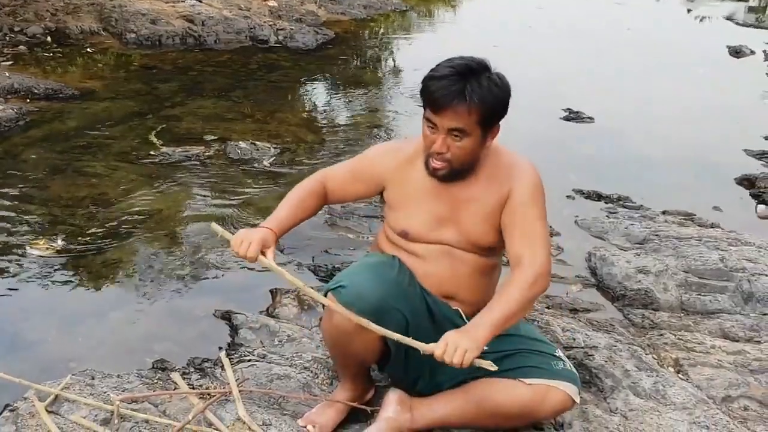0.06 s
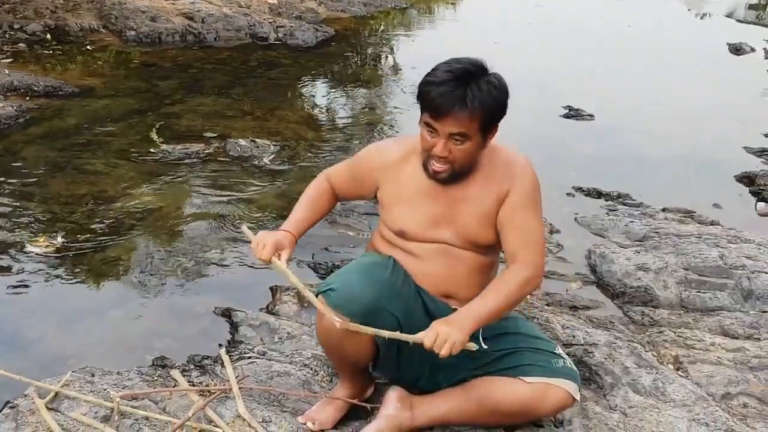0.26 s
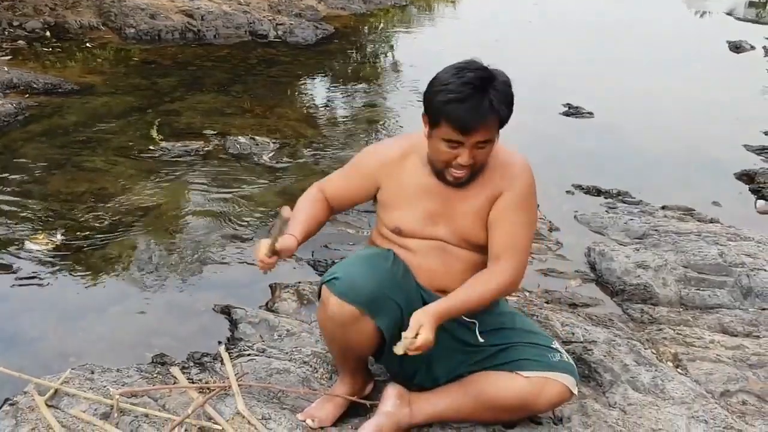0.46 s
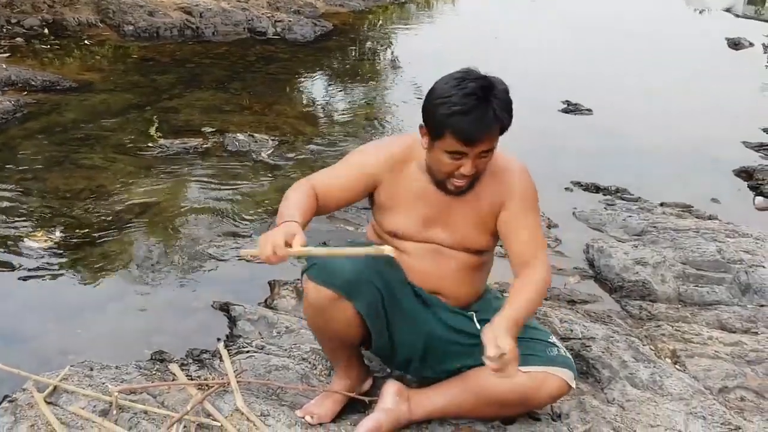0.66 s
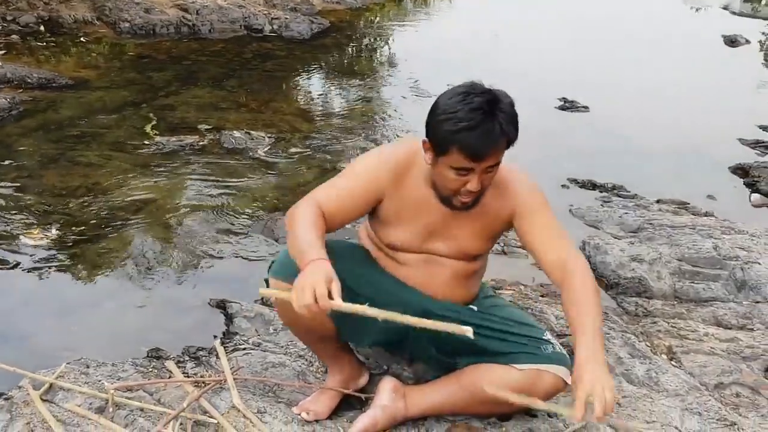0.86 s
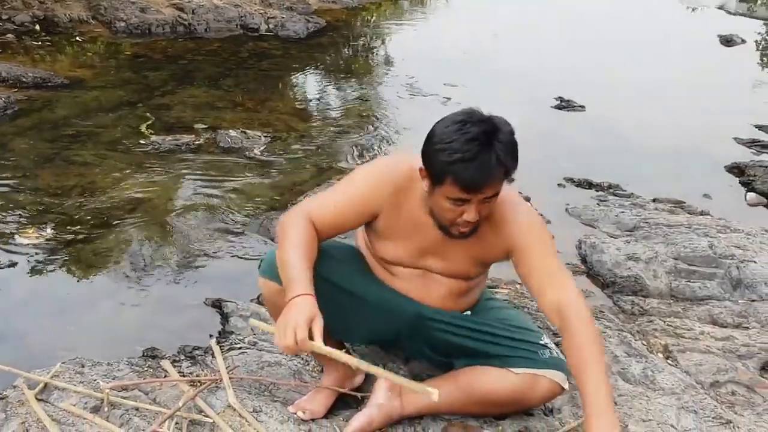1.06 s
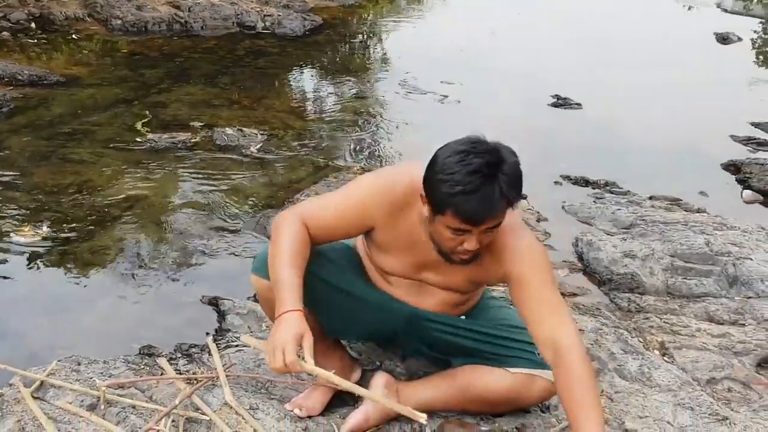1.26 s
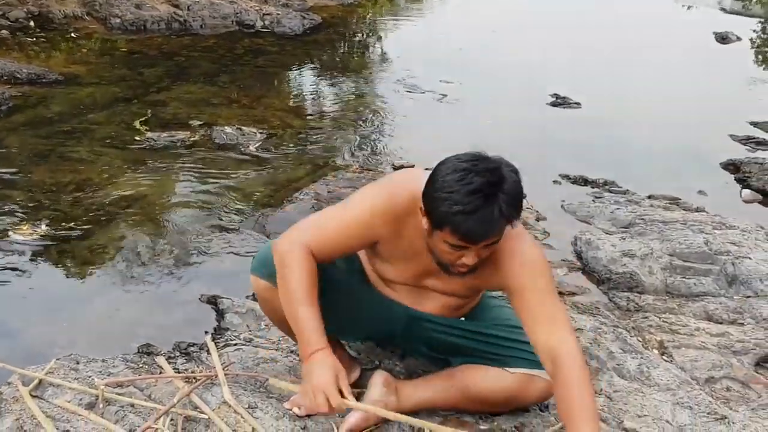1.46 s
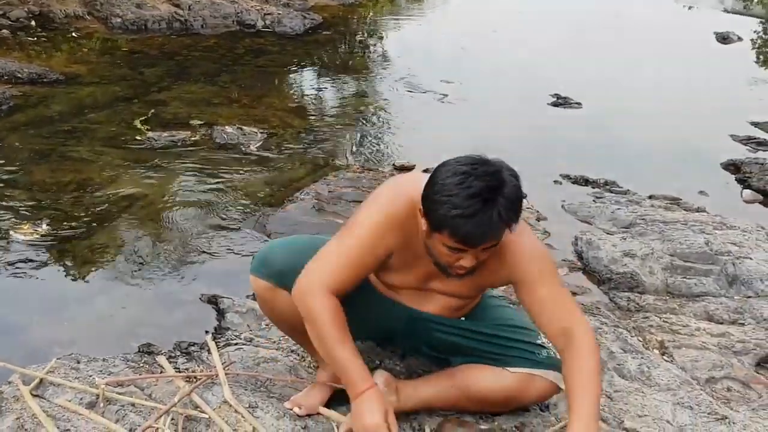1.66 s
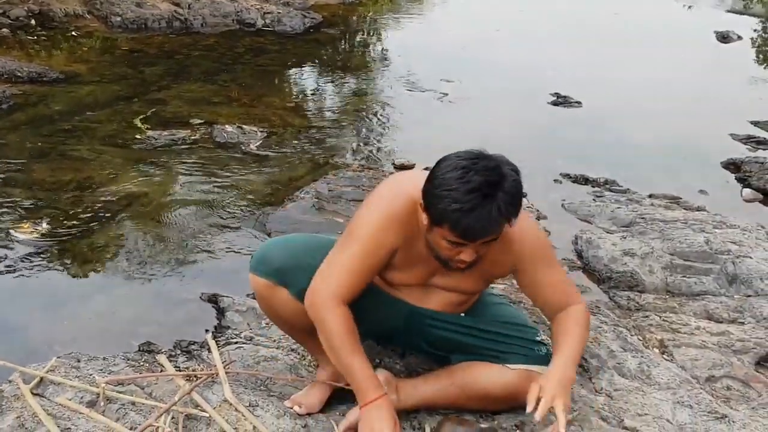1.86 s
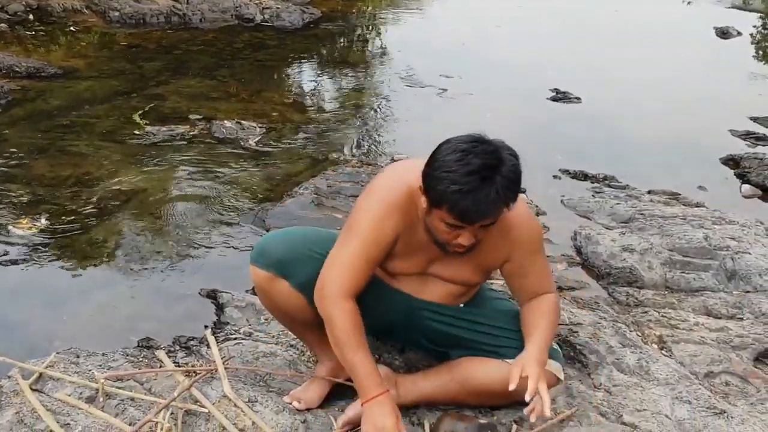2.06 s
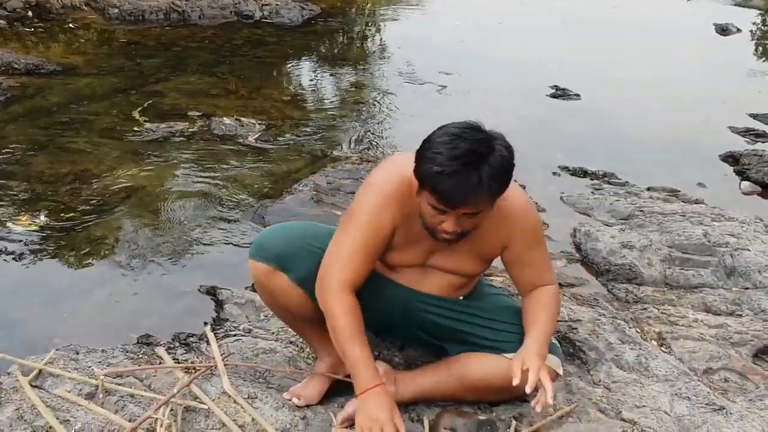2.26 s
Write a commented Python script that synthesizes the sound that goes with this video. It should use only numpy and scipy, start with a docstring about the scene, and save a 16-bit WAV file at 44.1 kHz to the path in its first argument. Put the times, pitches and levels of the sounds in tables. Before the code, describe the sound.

A dry stick ticks, then breaks in a loud, bright, splintering crack close to the microphone; its pieces tap once and later knock softly on rock, over faint high insect buzz outdoors.

```python
"""Insects buzz in high bands over a faint hush and a low breeze: filtered noise with a moving level.
A dry stick bends, cracks and tears: bursts of clicks and a dense crackle excite short fibre resonances.
The pieces are then knocked down on rock: longer bursts ring stick resonances, each with a low thump.
Trees and rock scatter the sounds back as a wash: convolution with octave bands of dying noise."""
import sys
import numpy as np
from scipy import signal
from scipy.fft import rfft, irfft
from scipy.io import wavfile

SR = 44100
rng = np.random.default_rng(int(sys.argv[2]) if len(sys.argv) > 2 else 0)


def digitize_waveform(pressure):
    """Quantize a signal to 16-bit integers and store it at the path in sys.argv[1].

    Rows of a 2-D input are taken as channels; values are limited to [-1, 1].
    """
    field = np.atleast_2d(pressure).T
    bounded = np.clip(field, -1, 1)
    quanta = np.round(bounded * 32767).astype(np.int16)
    wavfile.write(sys.argv[1], SR, quanta)


N = 101429

# broad resonances of splitting fibres: (frequency [Hz], relative level [dB], 60 dB decay time [s])
FIBRE_MODES = [(2480, -10, 0.0023), (3180, -7, 0.0036), (4060, -4.5, 0.0036), (5100, -4, 0.0026),
               (6450, -3, 0.0022), (7760, -0.5, 0.0028), (8950, 0, 0.0015), (11480, -2.5, 0.0019),
               (13440, -7.5, .003), (16200, -7.5, 0.0023)]


def amp(db):
    """Decibels to amplitude ratio: 20 dB is a factor of ten."""
    return 10 ** (np.asarray(db) / 20)


def rms_one(x):
    """Normalisation to unit root-mean-square."""
    return x / np.sqrt(np.mean(x ** 2) + 1e-20)


def in_time(rows, **ends):
    """Linear interpolation of each column over the scene's samples."""
    times, *columns = np.transpose(rows)
    return [np.interp(np.arange(N) / SR, times, column, **ends) for column in columns]


def sides(pan_db):
    """Level difference between the ears: left and right gains, pan_db apart."""
    return amp(np.array([[.5], [-.5]]) * pan_db)


def drift(rate_hz):
    """Low-passed noise: a slow random wander of unit spread."""
    step = 40   # samples between computed points
    pole = np.exp(-2 * np.pi * rate_hz * step / SR)
    noise = rng.standard_normal(N // step + 2002)
    slow = signal.lfilter([1], [1, -2 * pole, pole * pole], noise)[2000:]   # settled part only
    return np.interp(np.arange(N) / step, np.arange(len(slow)), rms_one(slow))


def insect(level_db, hz, width_hz, buzz_hz, sharpness, wander, throb_hz, throb_db, gain_db, pan_db):
    """Amplitude modulation of noise: pulses at the buzz rate, band-passed, then throbbing in level."""
    t = np.arange(N) / SR
    edges = [hz - width_hz / 2, hz + width_hz / 2]
    band = signal.butter(3, edges, "band", fs=SR, output="sos")
    phase = 2 * np.pi * buzz_hz * t + wander * drift(3.9)
    pulses = np.exp(min(sharpness, 6 / 5) * np.sin(phase))
    chorus = signal.sosfilt(band, pulses * rng.standard_normal((2, N)))
    throb = np.sin(2 * np.pi * throb_hz * t + 0.92) + 2.1 * drift(7.0)
    return amp(level_db + gain_db + throb_db * throb) * rms_one(chorus) * sides(pan_db)


def insects(level_db):
    """Superposition of independent choruses, a narrow one overlapping a broad one near 8 kHz."""
    # one chorus a row: (centre [Hz], width [Hz], buzz rate [Hz], buzz sharpness [-], buzz wander [rad],
    # throb rate [Hz], throb depth [dB], gain [dB], left-right [dB])
    choruses = [(8145, 420, 111, 0.61, .4, 17, 0.5, -1.5, 9), (8036, 1400, 104, 0.26, .6, 5.7, 0.5, 0, 4),
                (10880, 1200, 123.1, 0.41, .15, 2.9, 0.1, -10, 14),
                (4690, 700, 40, .3, .8, 3, -0.9, -13.5, 0)]
    return sum(insect(level_db, *chorus) for chorus in choruses)


def hush(level_db):
    """Spectral shaping of wide noise: the faint open air, its level flickering at random."""
    # colour of the noise: (frequency [Hz], relative spectral level [dB])
    hush_spectrum = np.array([(30, -7), (100, -5.5), (250, -18.5), (600, -8.5), (1200, -15.5),
                              (2400, -13.5), (4000, -10), (5800, -20.5), (7000, -11.5), (9500, -19.5),
                              (12500, -17), (16000, -6)])
    gain_db, flicker_db, pan_db = -2.5, 1.2, 6.5
    hz = np.maximum(np.arange(N // 2 + 1) * SR / N, 20)
    colour = amp(np.interp(np.log(hz), np.log(hush_spectrum[:, 0]), hush_spectrum[:, 1]))
    noise = irfft(rfft(rng.standard_normal((2, N))) * colour, N)
    return amp(level_db + gain_db + flicker_db * drift(9.9)) * rms_one(noise) * sides(pan_db)


def breeze(level_db):
    """Band-limited noise of moving air at the microphone ports, independent on each side, lumpy in level."""
    gain_db, gust_db, pan_db = -14, 2.5, 2.5
    band = signal.butter(2, [30, 110], "band", fs=SR, output="sos")
    low = signal.sosfilt(band, rng.standard_normal((2, N)))
    return amp(level_db + gain_db + gust_db * drift(9.9)) * rms_one(low) * sides(pan_db)


def ring(clicks, hz, t60):
    """Damped resonance: a unit click sets a decaying sine of height 1 ringing."""
    radius, angle = amp(-60 / (t60 * SR)), 2 * np.pi * hz / SR
    feedback = [1, -2 * radius * np.cos(angle), radius * radius]
    return signal.lfilter([0, np.sin(angle)], feedback, clicks + 1e-18)


def pair(clicks, likeness):
    """Partial coherence: the right side gets the left's clicks a little later, mixed with its own."""
    lag_s = .0002
    like = np.clip(likeness, 0, 1)
    late = np.roll(clicks[0], int(lag_s * SR), axis=-1)
    return np.stack([clicks[0], like * late + np.sqrt(1 - like ** 2) * clicks[1]])


def low_thump(t, hz, t60, right_share):
    """Two decaying partials, the lower one lasting longer, with a soft onset."""
    upper = np.sin(2 * np.pi * hz * t) * amp(-60 * t / t60)
    under = np.sin(2 * np.pi * hz * .56 * t) * amp(-4 - 60 * t / (1.5 * t60))
    return (upper - under) * (1 - np.exp(-4 * hz * t)) * [[1], [right_share]]


def blows(events, modes, thump_hz, thump_t60, thump_right, likeness):
    """Impulsive excitation of resonances: click bursts with thumps, and bare clicks to feed the wash."""
    after_db, after_s = -10, 0.0036   # smaller fibres follow each burst
    scatter_db, tilt_centre_hz = 2.5, 4000
    out, sent = np.zeros((2, N)), np.zeros((2, N))
    t = np.arange(2600) / SR
    thump = low_thump(t, thump_hz, thump_t60, thump_right)
    for s, db, pan_db, burst_ms, wash_db, tilt_db, thump_db in events:
        draw = rng.standard_normal((2, len(t)))
        scatter = scatter_db * rng.standard_normal(len(modes))
        main = np.exp(-(1000 * t / max(burst_ms, .1)) ** 2)
        shape = main + amp(after_db) * np.exp(-t / after_s)
        burst = pair(draw * np.sqrt(np.abs(draw)) * shape, likeness)   # the power makes clicks uneven
        sound = 0
        for k, (hz, level_db, t60) in enumerate(modes):
            mode_db = level_db + tilt_db * np.log2(hz / tilt_centre_hz) + scatter[k]
            sound = sound + (-1) ** k * amp(mode_db) * ring(burst, hz, t60)
        span = 10 + burst_ms * SR / 1000   # samples over which the energy is averaged
        energy = np.mean(np.sum(sound ** 2, axis=1))
        sound = sound / np.sqrt(energy / span) + amp(thump_db) * thump
        start = int(s * SR)
        out[:, start:start + len(t)] += amp(db) * sides(pan_db) * sound
        sent[:, start:start + 1] += amp(db + wash_db) * sides(pan_db) * np.sqrt(span)
    return out, sent


def cracking():
    """Sudden release of strain: breaking fibres click and ring briefly."""
    # breaks: (time [s], level [dB], left-right [dB], burst length [ms], tilt [dB per octave],
    # thump level relative to the burst [dB])
    snaps = [(0.0526, -28.5, 6, 0.79, 7.5, -39), (0.0555, -40.5, 8.5, 2.9, 2.3, -33),
             (0.1297, -34, 7, 1, 8.4, -33), (0.1318, -36.5, 14.5, 2.3, 6.5, -44),
             (0.1474, -41, 4, 2.7, 8, -30.0), (0.1495, -38.5, 15.5, 1.9, 11.75, -36.5),
             (0.199, -25.5, 14, 1, 5.3, -29), (0.201, -30, 4, 3.6, 0.9, -32.5),
             (0.2143, -30, 14.5, 2, -8.3, -28), (0.2166, -16.5, 4.5, 4, -3.6, -20.5),
             (0.2182, -13, 6.5, 0.61, 2.5, -20.5), (0.2196, -13.5, 16, 2.2, 1.2, -25),
             (0.224, -38, 6, 2.4, -4.5, -36.5), (0.2287, -17, 1.5, 2, -1.6, -26.5),
             (0.233, -10.5, 12, 0.9, -0.3, -28.5), (0.2352, -29.5, 4.5, 3, -4, -28),
             (0.2465, -18, 16.5, 0.79, 3.2, -37.5), (0.2483, -29, 5, 2.7, -8.3, -36.5),
             (0.2524, -16.5, 0.5, 2, 1.5, -21), (0.2573, -21.5, 13.5, 0.7, 5.6, -37.5),
             (0.2619, -20, 10, 0.78, 4.2, -21.5), (0.2636, -23.5, 0.5, 1.3, 3.3, -33.5),
             (0.2686, -15, 15.5, 0.5, -5, -23), (0.2725, -20, -14, 2.7, -0.6, -28.5),
             (0.2858, -29, -13, 1.5, -0.8, -17), (0.2893, -23, 9.5, 2.1, 9.3, -18),
             (0.2913, -20, 5, 6, 6.6, -25.5), (0.2986, -29, -0.5, 0.73, 9.9, -31.5),
             (0.3002, -25, 16, 3.4, 25.8, -41), (0.4695, -49, 4.5, 12, 0.1, -19.5)]
    events = np.insert(snaps, 4, 0, axis=1)   # fills the wash column, whose clicks are not used here
    cracks, _ = blows(events, FIBRE_MODES, thump_hz=120, thump_t60=0.019, thump_right=-0.83, likeness=0.17)
    return cracks


def tearing():
    """Random impulse train through resonances: dense tiny clicks of fibres peeling apart."""
    # steady tearing between the big cracks: (time [s], level [dB])
    tear_level = [(.2165, -35), (.222, -27), (.232, -31), (.243, -24.5), (.255, -22.5), (.27, -23),
                  (.281, -29.5), (.292, -20.5), (.304, -25), (.309, -24.5)]
    clicks_per_s, pan_db = 9000, 4
    level_db, = in_time(tear_level, left=-200, right=-200)
    struck = rng.random(N) < clicks_per_s / SR
    clicks = pair(rng.laplace(size=(2, N)) * struck, likeness=0.17)
    sound = 0
    for k, (hz, db, t60) in enumerate(FIBRE_MODES):
        sound = sound + (-1) ** k * amp(db) * ring(clicks, hz, t60)
    return amp(level_db) * rms_one(sound) * sides(pan_db)


def wash(x):
    """Scattering as convolution: bands of dying noise, stepping down once the nearest trees have answered."""
    # echoes from trees and rock: (octave centre [Hz], level before the band filter [dB], 60 dB decay time [s])
    echo_bands = [(150, -29.5, .3), (278, -27.5, 0.72), (586, -20, .5), (1240, -23.5, 0.98),
                  (2400, -18, 0.64), (4600, -18.5, 0.47), (9000, -21.5, 0.5), (13800, -20, .3)]
    rise_s, knee_db, knee_s, knee_width_s = 0.0015, -5.5, .105, .015
    t = np.arange(SR) / SR
    knee = amp(knee_db / (1 + np.exp((knee_s - t) / knee_width_s)))
    shape = (1 - np.exp(-t / rise_s)) * knee
    answer = 0
    for hz, db, t60 in echo_bands:
        band = signal.butter(2, [hz / np.sqrt(2), hz * np.sqrt(2)], "band", fs=SR, output="sos")
        noise = signal.sosfilt(band, rng.standard_normal((2, SR)))
        answer = answer + amp(db - 60 * t / t60) * noise
    return signal.fftconvolve(x, answer * shape, axes=1)[:, :N]


def knocking():
    """Impact excitation: sticks touching rock and each other ring their own modes over a thump."""
    # modes of a loose stick: (frequency [Hz], relative level [dB], 60 dB decay time [s])
    stick_modes = [(445, -8, 0.018), (605, -1.5, 0.0067), (888, -8.5, 0.026), (1090, -9, 0.011),
                   (1395, 3, 0.004), (1740, -9.5, 0.0099), (2380, -1.5, 0.007), (3270, -1.5, 0.0042),
                   (3430, -0.5, 0.0045), (4530, 2, 0.0025), (5760, 0.5, 0.0012), (7950, 9, 0.0013),
                   (10900, -10.5, 0.0048), (13010, -8, 0.0019)]
    # contacts: (time [s], level [dB], left-right [dB], burst length [ms], wash send [dB],
    # tilt [dB per octave], thump level relative to the burst [dB])
    taps = [(.7197, -37, 3, 1.96, -2.5, 1, -12), (.7245, -40, -2.5, 0.91, -8.5, -1.1, -16.5),
            (1.402, -62, 10, 14.5, -8, 2.4, -35), (1.435, -57, 4.5, 2.7, -18, 2, -30),
            (1.527, -52.5, 0, 3.1, -17, 4.5, -37.5), (1.5425, -38, 3.5, 3.9, -16.5, 2, -31),
            (1.547, -50, 9.5, 15, -18, 4.2, -37), (1.628, -50, 1.5, 4.6, -25, 4, -29),
            (1.788, -46.5, 2.5, 6.5, -11.5, 0, -37), (1.848, -52.5, 7, 9, -23, 5, -35),
            (1.9298, -30, 6.5, 5.45, -8, -0.5, -1.3), (1.9385, -37.5, -3.5, 6, -15, -0.4, -3),
            (1.97, -40, -3, 6.1, -4.5, -1.3, -2), (2.02, -45.5, 4, 7.5, -5, .1, 0),
            (2.05, -49, 2, 2.8, -4, 1, 3.5)]
    return blows(taps, stick_modes, thump_hz=316, thump_t60=0.028, thump_right=0.98, likeness=0.57)


def scene():
    """Linear superposition: sticks and their wash over insects, hush and breeze."""
    # background level, which dips after the loud snap and then recovers: (time [s], reference level [dB])
    backdrop = [(0, -55.5), (.19, -55.5), (.32, -56.5), (.45, -63), (.62, -66), (.9, -66.5), (1.1, -66),
                (1.3, -68.5), (1.45, -62), (1.6, -59), (1.7, -58), (2.05, -57), (2.3, -56.5)]
    crack_wash_db = -28
    air_db, = in_time(backdrop)
    air = insects(air_db) + hush(air_db) + breeze(air_db)
    breaking = cracking() + tearing()
    high_pass = signal.butter(4, 2200, "high", fs=SR, output="sos")
    thin = signal.sosfilt(high_pass, breaking)
    knocks, sent = knocking()
    low_pass = signal.butter(1, 4260, fs=SR, output="sos")
    dull = signal.sosfilt(low_pass, sent)
    return breaking + knocks + wash(amp(crack_wash_db) * thin + dull) + air


def record(dry):
    """Saturation rounds the peaks, then a steep low-pass removes the top."""
    ceiling, stop_hz = .6, 16700   # largest amplitude before the filter; 90 dB down from stop_hz
    rounded = ceiling * np.tanh(dry / ceiling)
    return signal.sosfilt(signal.cheby2(16, 90, stop_hz, fs=SR, output="sos"), rounded)


dry = scene()
out = record(dry)
digitize_waveform(out)
```